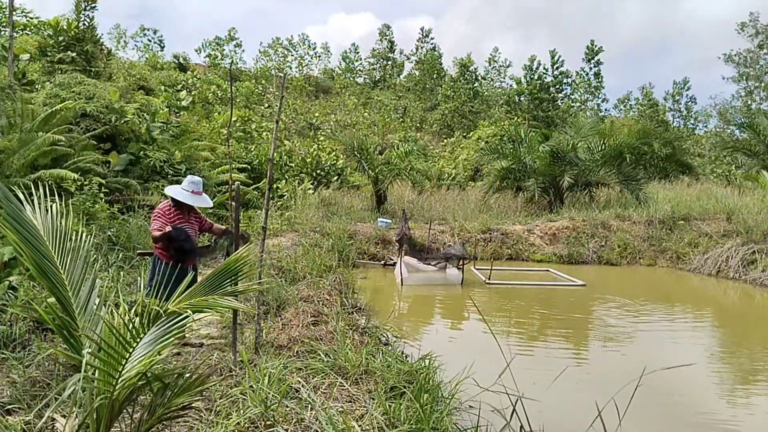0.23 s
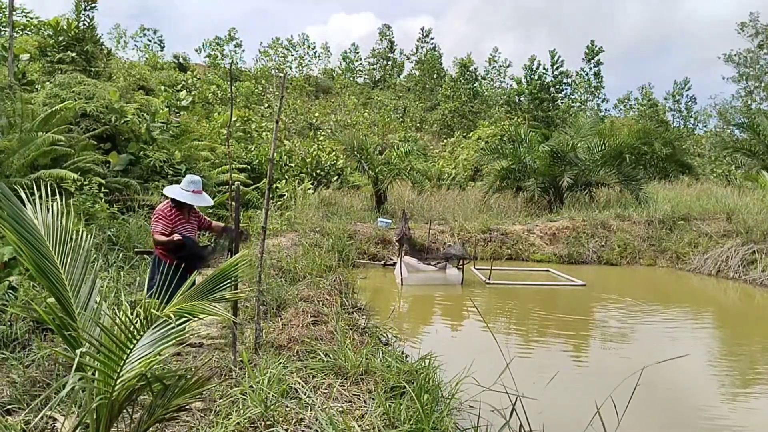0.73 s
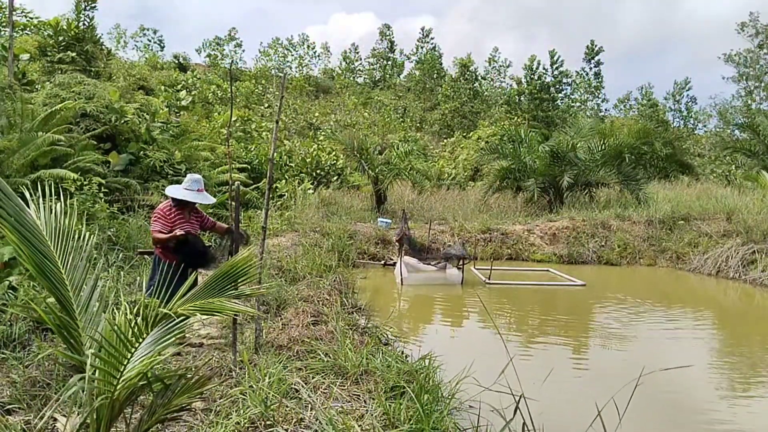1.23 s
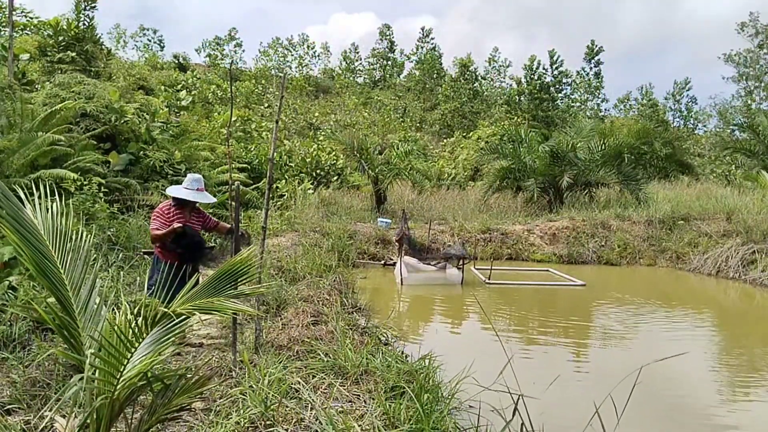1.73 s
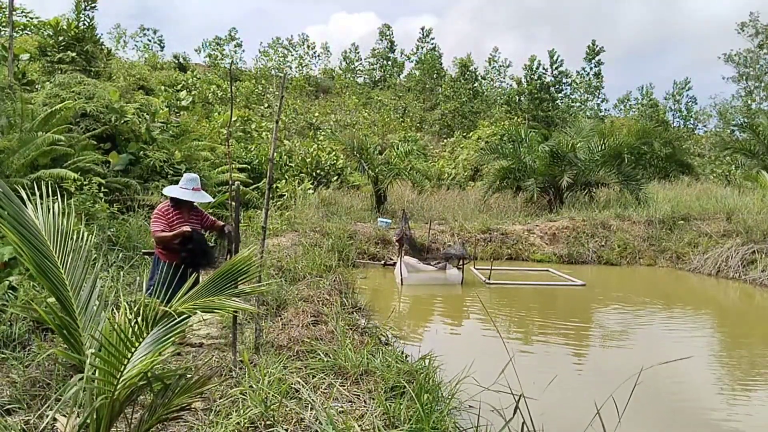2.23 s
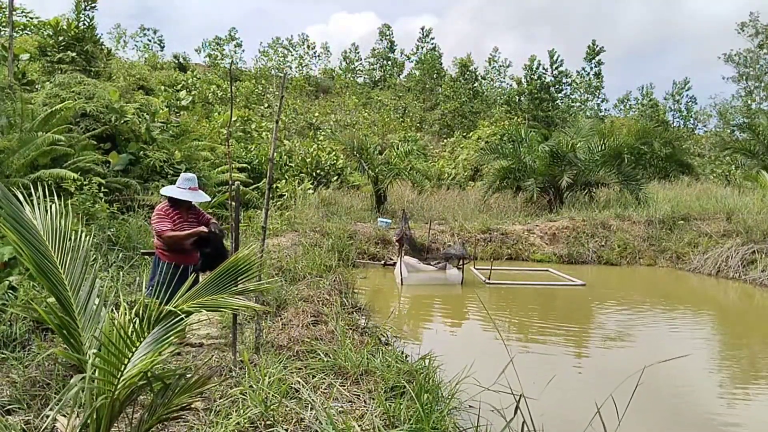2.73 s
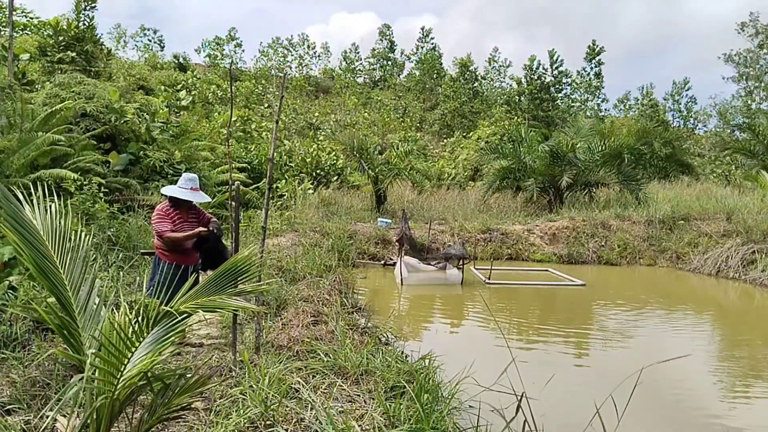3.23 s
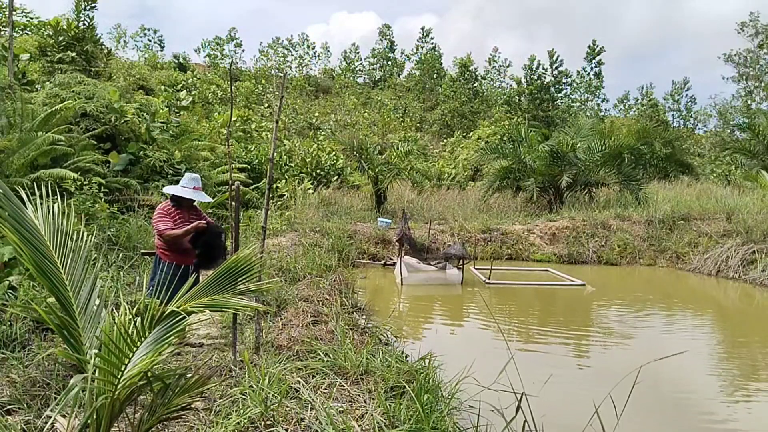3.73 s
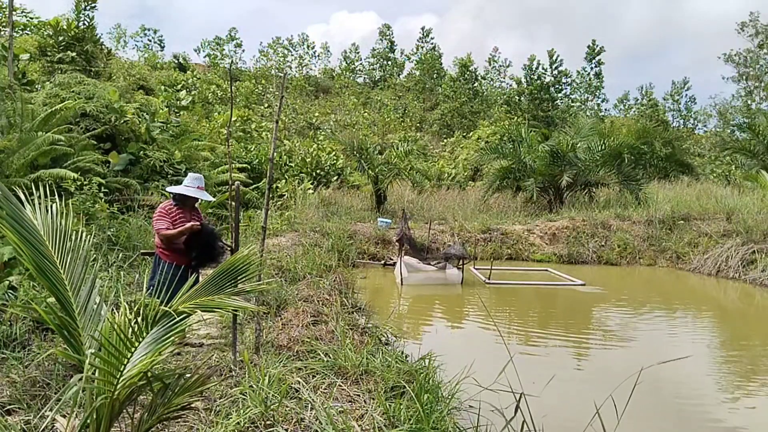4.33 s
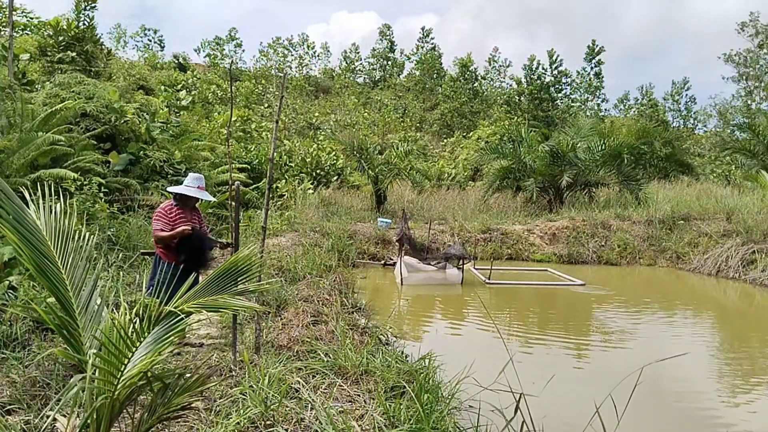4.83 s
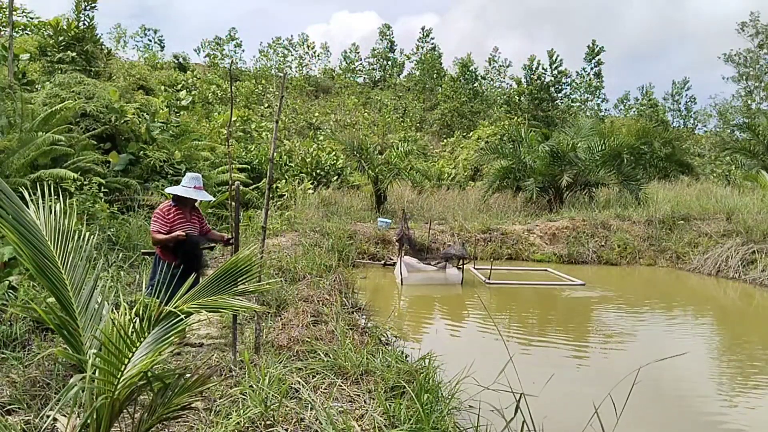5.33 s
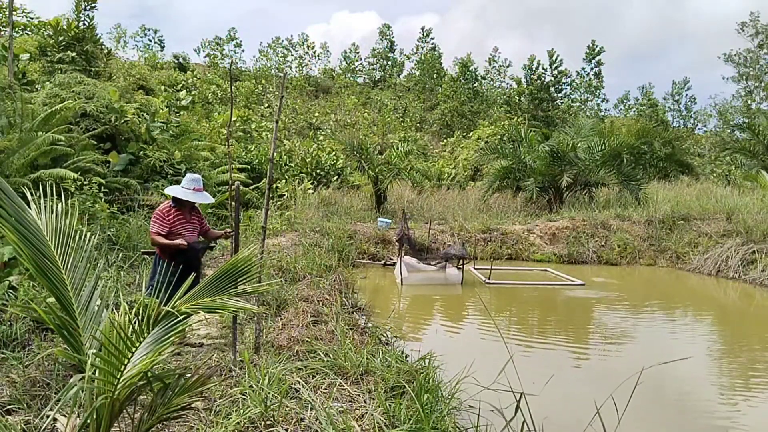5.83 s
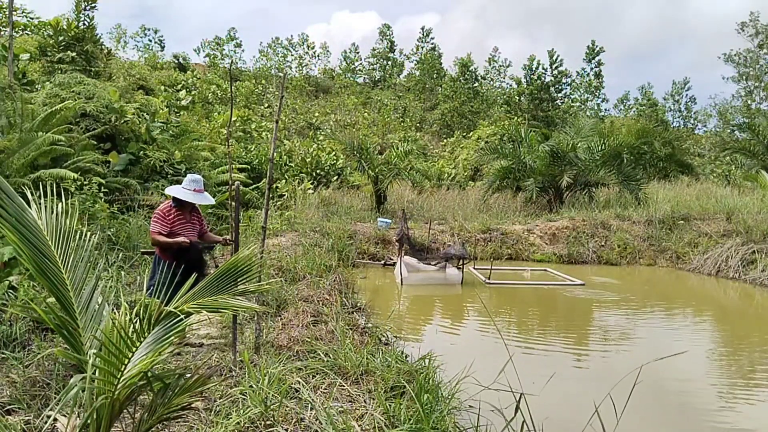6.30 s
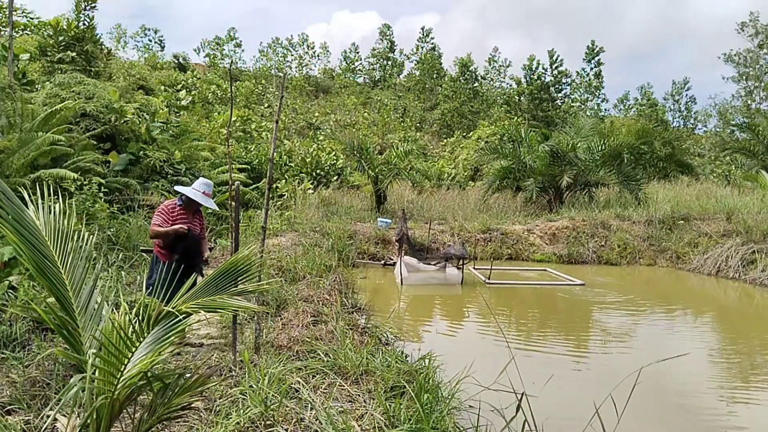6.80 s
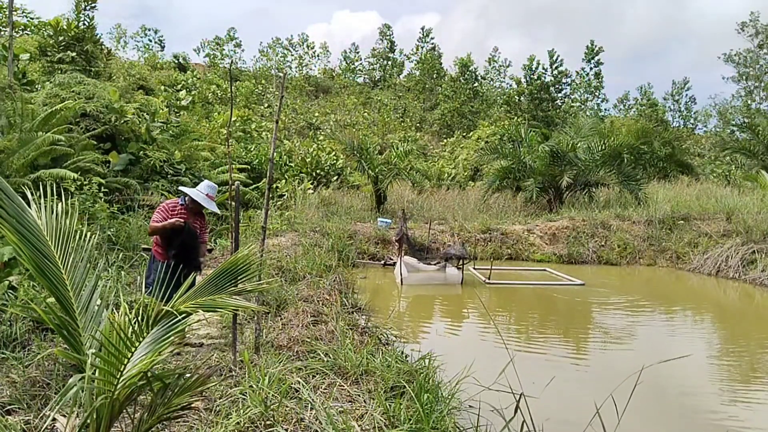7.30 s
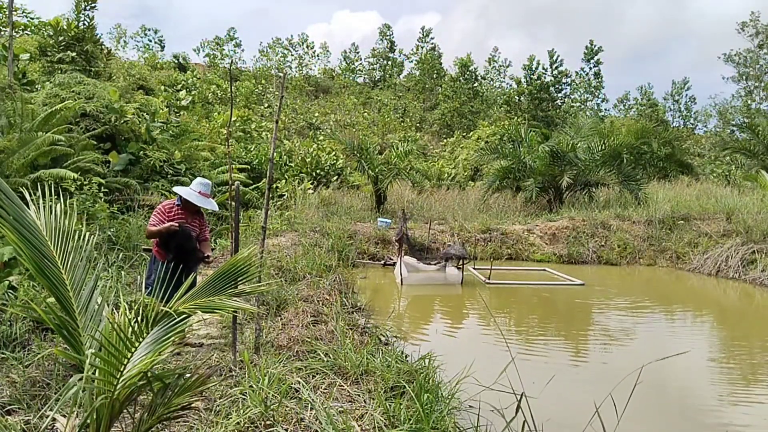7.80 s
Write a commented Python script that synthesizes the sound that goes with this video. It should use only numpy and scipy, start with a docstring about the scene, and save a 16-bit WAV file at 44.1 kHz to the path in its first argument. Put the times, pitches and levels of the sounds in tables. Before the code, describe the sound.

A quiet eight-second pond ambience, heard by one outdoor microphone. Throughout, high crickets around 7-8.5 kHz form a shimmering drone with trills, a katydid ticks about 22 times a second, and a bush cricket adds a very thin fluttering hiss. Beneath lie uneven wind rumble, a soft far rush and a distant engine hum, dipping near 1.5 s and slowly sinking. A far bird gives short hoarse falling hoots, five a second, from 0.15 to 2.5 s, then again from 2.7 to 5.5 s, weakening. Wind thumps the microphone near 0.7, 1.5, 3.1, 5.3, 6.3 and 7.2 s. Stems snap lightly from 1.5 s, with rustles from 2.5 s and sharp cracks at 5.8 and 6.2 s. Bubbly water plops at 2.6, 4.7, 5.3, 6.3, 6.9 and, clearly, 7.9 s. Faint bird whistles slide at 4.5, 5.1 and 6.7 s. Leaf crackles and a slower swelling cricket close it.

```python
"""A pond under a wooded hill: filtered noise gives wind rumble and a far rush, an engine hums in sine tones,
crickets drone and trill, a katydid ticks and a bush cricket hisses. From 0.15 s a far bird hoots five times
a second in two runs. From 0.6 s puffs of wind push the microphone; from 1.5 s someone handling a net snaps
and rustles dry stems, made of noise bursts and clicks. From 2.6 s water plops as ringing bubbles; from 4.5 s
a small bird whistles sliding notes."""
import sys
import numpy as np
from scipy import signal
from scipy.fft import rfft, irfft, next_fast_len
from scipy.io import wavfile
from scipy.ndimage import map_coordinates

SR = 44100
rng = np.random.default_rng(int(sys.argv[2]) if len(sys.argv) > 2 else 0)


def store_wav(level_fs):
    """Save 16-bit WAV to argv[1]."""
    pcm = np.round(np.clip(np.atleast_2d(level_fs), -1, 1) * 32767)
    wavfile.write(sys.argv[1], SR, pcm.T.astype(np.int16))


N = 355313  # length in samples


def amp(db):
    """Turn decibels into a gain."""
    return 10 ** (np.asarray(db) / 20)


def unit(x):
    """Scale x to an average (rms) level of 1."""
    return x / np.sqrt(np.mean(x ** 2) + 1e-20)


def along(points, hz):
    """Read a value off (pitch, value) points, spacing the pitches on a log axis."""
    point_hz, values = np.transpose(points)
    return np.interp(np.log(hz + 1), np.log(point_hz + 1), values)


def curves(rows):
    """Join the rows by straight lines: one value per sample for each column after the time."""
    times, *columns = np.transpose(rows)
    return [np.interp(np.arange(N) / SR, times, column) for column in columns]


def wobble(rate):
    """A smooth random curve through `rate` random points a second."""
    points = rng.standard_normal(4096)
    return map_coordinates(points, [np.arange(N) * rate / SR], mode="wrap")


def filtered(x, response):
    """Multiply the spectrum of x by a gain that depends on frequency."""
    size = next_fast_len(len(x) + 8192)
    spectrum = rfft(x, size) * response(np.fft.rfftfreq(size, 1 / SR))
    return irfft(spectrum, size)[:len(x)]


def noise(spectrum):
    """Random noise coloured by a table of relative levels, then scaled to rms 1."""
    return unit(filtered(rng.standard_normal(N), lambda hz: amp(along(spectrum, hz))))


def band(x, centre_hz, octaves):
    """Keep a bell-shaped band of x around one pitch."""
    return filtered(x, lambda hz: np.exp(-.5 * (np.log2((hz + 1) / centre_hz) / octaves) ** 2))


def arch(u):
    """Swell smoothly from 0 to 1 and back as u goes from 0 to 1."""
    return np.sin(np.pi * np.clip(u, 0, 1)) ** 2


def add(track, start_s, x):
    """Mix x into the track from a start time."""
    part = track[max(round(start_s * SR), 0):][:len(x)]
    part += x[:len(part)]


def warm_up(full_s, db_per_s):
    """Level in dB of a singer that swells until full_s and then holds."""
    return db_per_s * np.minimum(np.arange(N) / SR - full_s, 0)


# How long scattered sound lingers around the pond: pitch_hz, time_to_fall_60_db_s
LINGER = [(200, 0.64), (1500, 0.094), (8000, 0.25)]


def outdoors(x, wet_db):
    """Banks and trees scatter sound into a fading tail of noise, 5 ms behind the direct sound."""
    hz, t, pieces = signal.stft(rng.standard_normal(SR // 2), SR, nperseg=256)
    fade = amp(-60 * t / along(LINGER, hz)[:, None])
    tail = signal.istft(pieces * fade, SR, nperseg=256)[1]
    tail = np.pad(tail, (SR // 200, 0)) / np.linalg.norm(tail)
    return x + amp(wet_db) * signal.fftconvolve(x, tail)[:N]


# Colour of the wind rumble: pitch_hz, relative_level_db
RUMBLE_COLOUR = [(20, -4), (35, 2), (60, 9.5), (100, -9.5), (170, -7.5), (400, -49)]
# Colour of the far landscape's rush: pitch_hz, relative_level_db
RUSH_COLOUR = [(40, -5.5), (100, 2.5), (170, 3.5), (240, -3), (330, -3.5), (450, -5), (580, -10),
               (900, -13.5), (1300, -17), (2000, -23), (3500, -30.5), (6000, -37), (10500, -52.5),
               (12000, -59)]
# Rumble of the breeze at the microphone, before random wobble: time_s, level_db
BREEZE_LEVEL = [(0, -53), (1.7, -52), (2.8, -61.5), (5.9, -62), (7.1, -59.5), (8.06, -56.5)]
# Rush of the far landscape, before random wobble: time_s, level_db
RUSH_LEVEL = [(0, -53.5), (3, -54), (7, -55), (8.06, -57.5)]


def air():
    """Moving air makes an uneven low rumble, under the rush of the far landscape."""
    rumble_db = curves(BREEZE_LEVEL)[0] + wobble(4)
    rush_db = curves(RUSH_LEVEL)[0] + wobble(6.2)
    return amp(rumble_db) * noise(RUMBLE_COLOUR) + amp(rush_db) * noise(RUSH_COLOUR)


# Tones in the engine's hum, before wobble: multiple_of_firing_rate, relative_level_db
EXHAUST_TONES = [(2, -9), (3, -1.5), (4, -14.5), (5, -16), (8, -14)]
# Colour of the engine's rough roar: pitch_hz, relative_level_db
ROAR_COLOUR = [(90, -19), (140, 6.5), (180, -1), (220, -7.5), (270, -1.5), (315, -1.5), (370, -5),
               (480, -9.5), (700, -40.5)]
# How well the engine carries, before wobble: time_s, hum_level_db, roar_level_db
ENGINE_LEVELS = [(0, -54, -67), (1.5, -65, -76), (2.1, -48, -61.5), (2.6, -50.5, -51.5), (4, -45.5, -58.5),
                 (4.9, -52, -59.5), (7, -48, -55), (8.06, -47.5, -60)]
ENGINE_HZ, ENGINE_SAG_HZ_PER_S = 40.17, .325  # firing rate at the start, and how fast it sinks


def engine():
    """Only low exhaust tones and a dull roar of the slowing engine carry this far through the moving air."""
    rate = ENGINE_HZ - ENGINE_SAG_HZ_PER_S * np.arange(N) / SR
    hum_db, roar_db = curves(ENGINE_LEVELS)
    phase = 2 * np.pi * np.cumsum(rate * (1 + 0.0036 * wobble(14))) / SR
    hum = np.zeros(N)
    for multiple, level_db in EXHAUST_TONES:
        # shifting paths through the air blur the level and phase of each tone
        gain = amp(level_db + wobble(10))
        blur = .35 * wobble(9) + rng.uniform(0, 2 * np.pi)
        hum += gain * np.sin(multiple * phase + blur)
    return amp(hum_db) * hum + amp(roar_db + wobble(12)) * noise(ROAR_COLOUR)


def cricket(hz, rate, duty, scatter_hz):
    """Wing strokes ring a narrow, roughened tone that sinks within each chirp; the song's level is uneven."""
    cycle = (np.cumsum(rate * (1 + 0.0079 * wobble(3))) / SR + rng.random()) % 1
    stroke = cycle / duty  # 0 to 1 while the wings sound, above 1 while they rest
    pitch = hz + scatter_hz * (wobble(300) + .5 - np.minimum(stroke, 1))
    chirps = np.sqrt(arch(stroke)) * np.sin(2 * np.pi * np.cumsum(pitch) / SR)
    bouts = amp(5 * np.minimum(wobble(5), .5))
    return unit(outdoors(chirps * bouts, wet_db=-4))


# Colour of the far cricket chorus: pitch_hz, relative_level_db
CHORUS_COLOUR = [(6000, -44), (6650, -23), (7000, -7.5), (7280, 0.5), (7600, -0.5), (7850, 1), (8100, -6),
                 (8350, -1), (8570, -15), (8850, -15.5), (9600, -27), (10200, -38), (10800, -27),
                 (12000, -70)]
# Far chorus, before a fixed lift and the shimmer: time_s, level_db
CHORUS_LEVEL = [(0, -64), (1.2, -61), (4, -62.5), (5.5, -60.5), (8.06, -62)]
# How each near cricket sings: chirps_per_s, share_of_cycle_sounding, scatter_hz, level_db
NEAR_CRICKETS = [(19.66, 0.73, 70, -64), (18.6, 0.37, 82, -66.5), (19, 0.65, 80, -77),
                 (35, 0.65, 31, -72.5), (7.44, 0.78, 98, -84.5)]
# Middle pitch of each near cricket, in the same order: pitch_hz
NEAR_CRICKET_PITCHES = [7575, 8305, 7310, 8560, 9480]
LATE_CRICKET_DB, LATE_FULL_S, LATE_RISE_DB_PER_S = -74.5, 7.25, 17  # full level, when reached, its swell


def insects():
    """Countless far crickets merge into a shimmering drone; near ones stand out, and a slow one swells late."""
    shimmer = 1 + 0.12 * np.sin(2 * np.pi * np.cumsum(19.6 + 0.48 * wobble(3.3)) / SR)
    drone = amp(curves(CHORUS_LEVEL)[0] + 1.54) * noise(CHORUS_COLOUR) * shimmer
    near = np.zeros(N)
    for hz, (rate, duty, scatter_hz, level_db) in zip(NEAR_CRICKET_PITCHES, NEAR_CRICKETS):
        near += amp(level_db) * cricket(hz, rate, duty, scatter_hz)
    late = cricket(hz=9250, rate=7.3, duty=.65, scatter_hz=110)
    late_db = LATE_CRICKET_DB + warm_up(LATE_FULL_S, LATE_RISE_DB_PER_S)
    return drone + near + amp(late_db) * late


# Colour of the katydid's rasp: pitch_hz, relative_level_db
RASP_COLOUR = [(6500, -22), (7800, 5.5), (8500, 5.5), (9000, -3.5), (9600, -1.5), (10200, -7.5),
               (10800, -38), (12000, -56)]
KATYDID_TICKS_PER_S = 22.1
KATYDID_DB, KATYDID_FULL_S, KATYDID_RISE_DB_PER_S = -68.5, 1.3, 3  # it warms up, then holds


def katydid():
    """It ticks at a nearly even pace; each tick is three quick rasps of noise and a rest."""
    rate = KATYDID_TICKS_PER_S * (1 + .007 * wobble(2.1))
    beat = 4 * (np.cumsum(rate) / SR % 1)  # counts 0 to 4 within a tick
    rasps = sum(size * arch(beat - k) for k, size in enumerate([.7, 1, .85]))
    level_db = KATYDID_DB + warm_up(KATYDID_FULL_S, KATYDID_RISE_DB_PER_S)
    return amp(level_db) * unit(outdoors(noise(RASP_COLOUR) * rasps, wet_db=-30))


# Colour of the bush cricket's hiss: pitch_hz, relative_level_db
SIZZLE_COLOUR = [(11000, -45), (13000, -32), (14200, -3), (15200, -5), (15700, -4.5)]


def sizzle():
    """A bush cricket's very thin hiss of noise flutters in level about three times a second."""
    flutter = np.sin(2 * np.pi * np.cumsum(3.3 + 0.6 * wobble(2.3)) / SR)
    return amp(-72.5 + 1.1 * flutter) * noise(SIZZLE_COLOUR)


# Runs of hoots: first_note_s, notes_count, first_gap_s, each_gap_longer_by_s
RUNS_OF_HOOTS = [(.147, 13, .19, .0011), (2.662, 17, .1795, .00038)]


def hoot_times():
    """Within a run each gap is a little longer than the one before."""
    times = []
    for start_s, notes, gap_s, slowing_s in RUNS_OF_HOOTS:
        for k in range(notes):
            times.append(start_s + k * (gap_s + slowing_s * (k - 1) / 2))
    return times


# Colour of the hoarse breath in a hoot: pitch_hz, relative_level_db
HOARSE_COLOUR = [(220, -32), (340, -1), (430, 5), (540, -13), (690, 3), (830, -8.5), (1050, -18.5),
                 (1700, -19), (2600, -41), (5000, -64)]
# The hooting bird's effort, which sets the levels of its notes: time_s, effort_db
BIRD_EFFORT = [(.15, -47.5), (.7, -46), (1.2, -49.5), (3.4, -51.5), (4.6, -55), (5.6, -58.5)]
HOOT_HZ, HOOT_SAG_HZ_PER_S = 352.8, 3.1  # the pitch sinks as the bird tires
HOOT_S, HOARSE_S = .028, 0.062  # length of a note's tone and of its hoarse part
HOOT_FALL = 0.23  # drop within a note, as a share of its pitch
HOOT_BODY_DB, HOOT_BODY_FOLLOWS = -51, 0.24  # low tone at an effort of -51 dB; its dB per dB of effort


def hoots():
    """Short, hoarse, falling notes echo off the hill; with less effort the overtone fades more than the low tone."""
    tones, hoarse, t = np.zeros(N), np.zeros(N), np.arange(SR // 10) / SR
    for s in hoot_times():
        effort_db = np.interp(s, *np.transpose(BIRD_EFFORT))
        hz = (HOOT_HZ - HOOT_SAG_HZ_PER_S * s) * (1 + .04 * rng.standard_normal())
        falling_hz = hz * (1 + HOOT_FALL * (.5 - t / HOOT_S))
        phase = 2 * np.pi * np.cumsum(falling_hz) / SR + rng.standard_normal()
        body_db = HOOT_BODY_DB + HOOT_BODY_FOLLOWS * (effort_db - HOOT_BODY_DB)
        note = amp(body_db) * np.sin(phase) + amp(effort_db - 2.5) * np.sin(2 * phase)
        add(tones, s - HOOT_S / 2, arch(t / HOOT_S) * note)
        # the square root makes the breath swell fast and fade slowly
        breath = amp((effort_db + body_db) / 2 - 1.5) * arch(np.sqrt(t / HOARSE_S))
        add(hoarse, s - HOOT_S / 2, breath)
    return outdoors(tones + hoarse * noise(HOARSE_COLOUR), wet_db=-5.5)


# Wind puffs: start_s, level_db
WIND_PUFFS = [(.635, -36), (0.776, -33), (.822, -38), (1.471, -45), (1.595, -43), (3.077, -34.5),
              (5.335, -38.5), (6.25, -42), (6.317, -34.5), (7.224, -41)]
PUFF_S, PUFF_HZ = 0.043, 56  # length of every eddy, and its pitch at the start


def puffs():
    """Each eddy pushes the microphone back and forth a few times, slightly faster as it goes."""
    out, t = np.zeros(N), np.arange(SR // 5) / SR
    push = arch(t / PUFF_S) * np.sin(2 * np.pi * PUFF_HZ * t * (1 + t))
    for start_s, level_db in WIND_PUFFS:
        add(out, start_s, amp(level_db) * push)
    return out


CRACKLE_SPREAD_DB = 5  # how much the clicks differ in strength


def crackle(length_s, centre_hz, count):
    """Brushed leaves give many tiny clicks, each ringing briefly at its own pitch; rms 1 over the length."""
    out, t = np.zeros(SR // 4), np.arange(SR // 50) / SR
    places = rng.beta(2, 2, count)  # clicks crowd towards the middle
    for place, (pitch, size) in zip(places, rng.standard_normal((count, 2))):
        hz = centre_hz * np.exp(0.28 * np.clip(pitch, -2, 2))
        ring = np.exp(-t * hz / 3) * np.sin(2 * np.pi * hz * t)
        add(out, place * length_s, amp(CRACKLE_SPREAD_DB * size) * ring)
    return out / np.sqrt(np.sum(out ** 2) / (length_s * SR))


# Snapping stems, before a fixed lift: start_s, centre_hz, width_octaves, peak_db
STEM_SNAPS = [(1.499, 1900, 0.81, -42.5), (1.5, 4700, .12, -52), (2.535, 1890, .5, -45),
              (2.54, 1360, 0.36, -40.5), (2.844, 1540, 0.28, -45), (2.877, 7000, .88, -44),
              (2.918, 5000, .08, -53), (3.059, 5700, .2, -46), (3.867, 6440, 0.079, -53),
              (4.6, 5740, 0.18, -50.5), (4.995, 1590, 0.64, -44), (5.029, 3700, 0.77, -48),
              (5.037, 2360, 0.14, -50.5), (5.193, 3270, 0.1, -54), (5.25, 6000, .45, -46),
              (5.688, 2470, 0.093, -52.5), (5.786, 3330, 0.21, -34), (5.806, 5500, .56, -37),
              (5.8161, 4040, 1, -26.5), (6.1924, 4320, 0.3, -24.5), (6.194, 2490, 0.23, -28),
              (6.805, 2200, 0.75, -44.5), (6.987, 5800, 0.4, -40), (7.011, 8460, 0.45, -41)]
# Leaves being brushed: start_s, length_s, centre_hz, level_db
LEAF_RUSTLES = [(2.515, 0.14, 1910, -73), (2.821, 0.2, 1680, -71), (4.562, 0.18, 2380, -72),
                (4.993, 0.071, 3800, -63), (5.136, 0.2, 2960, -74), (5.806, 0.038, 4400, -60.5),
                (6.192, 0.12, 3200, -80), (6.833, .19, 2100, -68), (7.098, 0.067, 1410, -68.5),
                (7.342, 0.071, 2600, -66), (7.428, 0.063, 1620, -72), (7.789, .04, 3500, -71),
                (7.852, .08, 2090, -68)]
SNAP_T60_S, SNAP_REF_DB = 0.028, -38.5  # splinters fall 60 dB in this time, for a snap of this table level
SNAP_HALVES_DB = 19  # extra force that halves the time


def stems():
    """A dry stem breaks with a crack and a splintering tail, shorter the harder it snaps; brushed leaves crackle."""
    out, t = np.zeros(N), np.arange(SR // 5) / SR
    lead = SR // 100  # room for the filter to ring ahead of the crack
    for start_s, hz, octaves, peak_db in STEM_SNAPS:
        t60 = SNAP_T60_S * 2 ** ((SNAP_REF_DB - peak_db) / SNAP_HALVES_DB)
        splinters = rng.standard_normal(len(t)) * amp(-60 * t / t60)
        click = 11 * (t == 0)
        crack = band(np.pad(click + splinters, (lead, 0)), hz, octaves)
        add(out, start_s - lead / SR, amp(peak_db + 0.5) * crack / np.abs(crack).max())
    for start_s, length_s, hz, level_db in LEAF_RUSTLES:
        add(out, start_s, amp(level_db) * crackle(length_s, hz, count=70))
    return outdoors(out, wet_db=-13)


# Water plops: start_s, pitch_hz, rise_octaves_per_s, peak_db
WATER_PLOPS = [(2.584, 1034, 2, -35.5), (2.59, 1450, 0, -45.5), (3.058, 1870, 2, -52.5),
               (4.702, 820, 5, -48), (5.337, 1020, 8, -49.5), (6.267, 1480, 4, -43),
               (6.268, 3320, 0, -55.5), (6.405, 1626, -2, -41), (6.873, 2370, 17, -50.5),
               (6.897, 1150, 12, -50), (6.932, 880, 7, -48.5), (6.943, 1440, 35, -58),
               (6.979, 2790, 14, -44), (7.901, 1225, 1, -32.5)]
BUBBLE_SWELL_S = .0022  # time a bubble takes to reach full strength


def plops():
    """Small bubbles swell and ring for a few cycles, most rising in pitch as they reach the surface."""
    out, t = np.zeros(N), np.arange(SR // 20) / SR
    u = t / BUBBLE_SWELL_S
    swell = (u * np.exp(1 - u)) ** 2
    for start_s, hz, rise, peak_db in WATER_PLOPS:
        phase = 2 * np.pi * np.cumsum(hz * 2 ** (rise * t)) / SR
        add(out, start_s, amp(peak_db) * swell * np.sin(phase))
    return outdoors(out, wet_db=-8)


# Whistled notes: start_s, highest_pitch_hz, peak_db
WHISTLED_NOTES = [(4.505, 3430, -69.5), (5.076, 3530, -62), (6.676, 3515, -62.5)]
WHISTLE_S, WHISTLE_BEND = 0.123, .08  # length; depth of the pitch arc


def whistles():
    """A small bird's thin note slides up, levels off and dips slightly, and lingers among the trees."""
    out, t = np.zeros(N), np.arange(SR // 5) / SR
    for start_s, hz, peak_db in WHISTLED_NOTES:
        pitch = hz * (1 - WHISTLE_BEND * (t / WHISTLE_S - .65) ** 2)
        tone = np.sin(2 * np.pi * np.cumsum(pitch) / SR)
        add(out, start_s, amp(peak_db) * arch(t / WHISTLE_S) * tone)
    return outdoors(out, wet_db=-7)


def scene():
    """Add up everything around the pond, at one microphone."""
    steady = air() + engine() + insects() + katydid() + sizzle()
    events = hoots() + puffs() + stems() + plops() + whistles()
    return (steady + events)[None]


# Final treble shaping: pitch_hz, gain_db
TREBLE_SHAPE = [(10500, -0.5), (10780, -10.5), (11000, -38), (16000, -12)]
TOP_HZ = 15600  # nothing is kept from here up


def record(dry):
    """The treble drops steeply near 11 kHz, partly returns towards 15 kHz, and stops at TOP_HZ."""
    return filtered(dry[0], lambda hz: amp(along(TREBLE_SHAPE, hz)) * (hz < TOP_HZ))[None]


dry = scene()
out = record(dry)
store_wav(out)
```